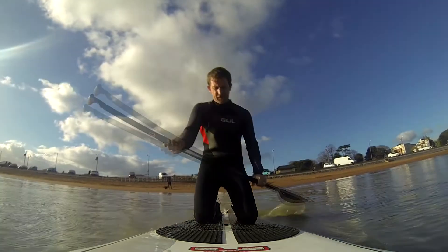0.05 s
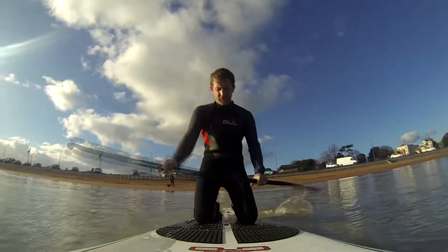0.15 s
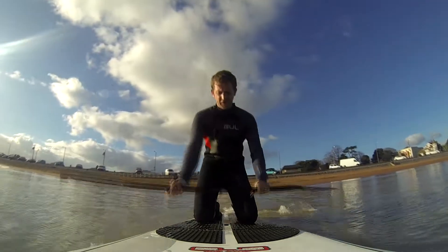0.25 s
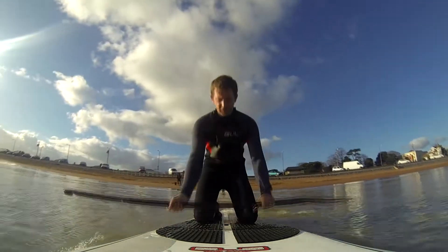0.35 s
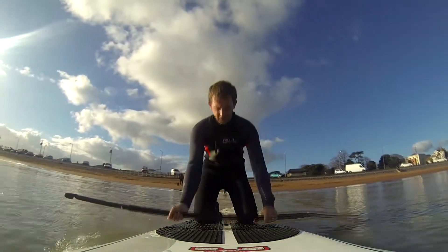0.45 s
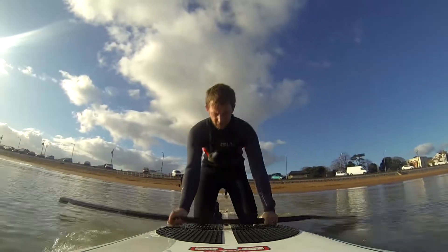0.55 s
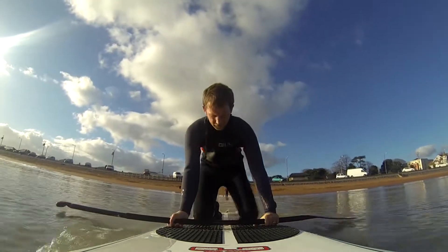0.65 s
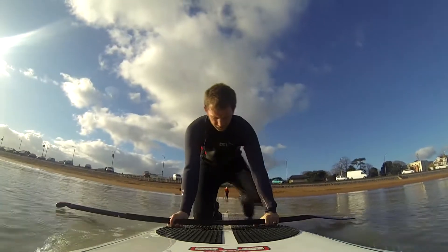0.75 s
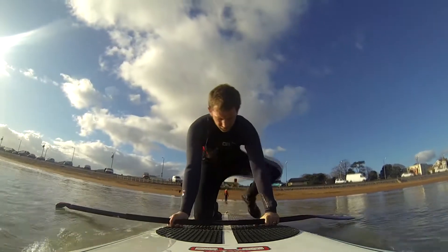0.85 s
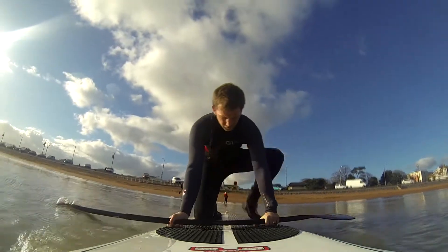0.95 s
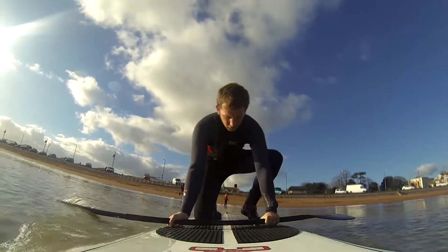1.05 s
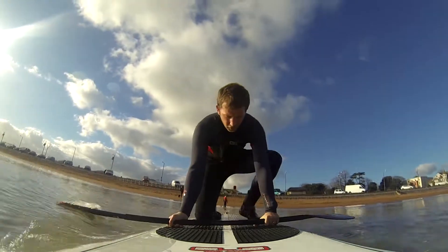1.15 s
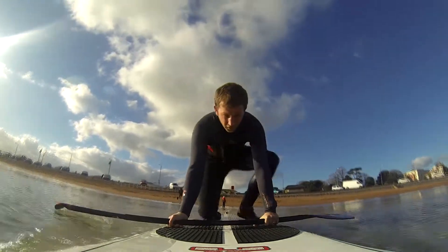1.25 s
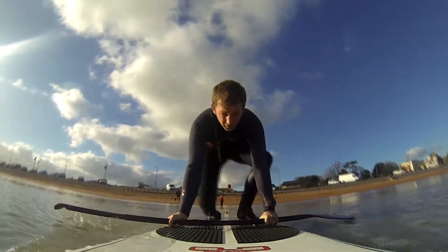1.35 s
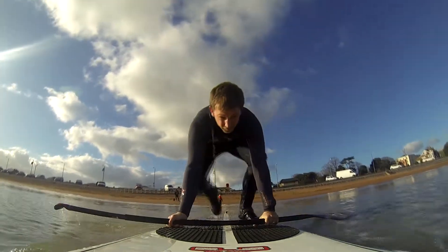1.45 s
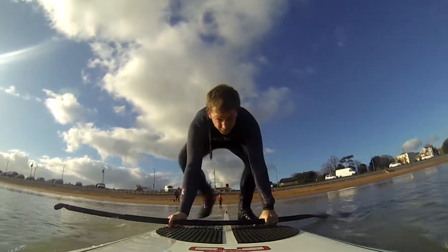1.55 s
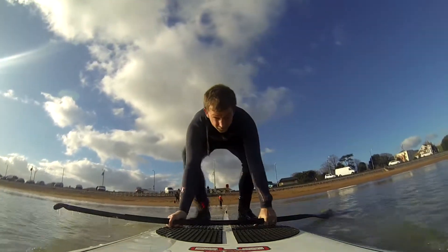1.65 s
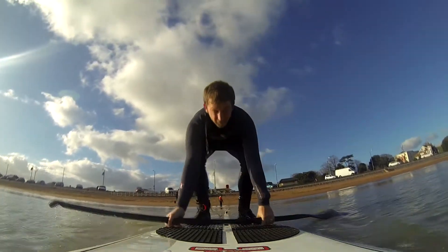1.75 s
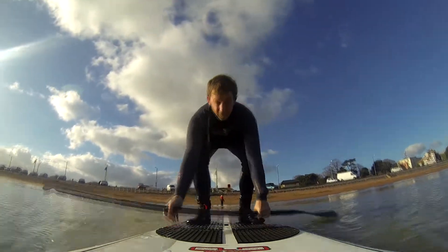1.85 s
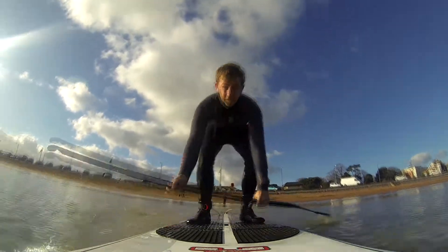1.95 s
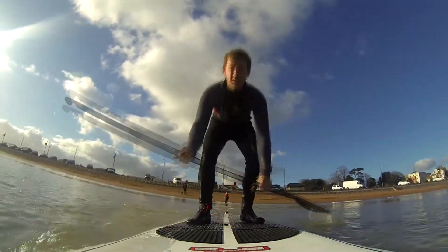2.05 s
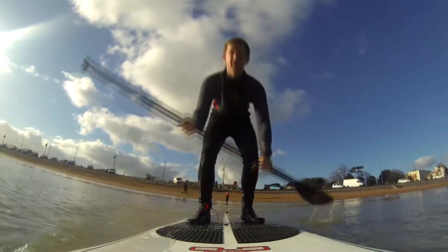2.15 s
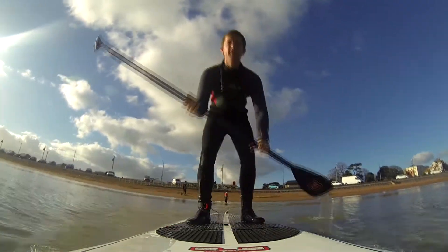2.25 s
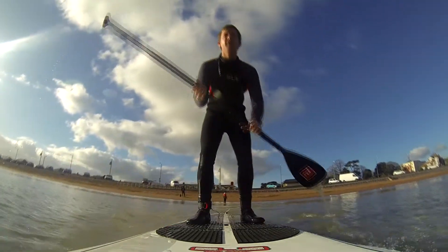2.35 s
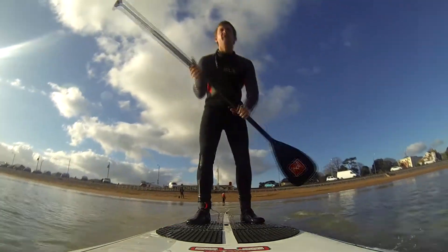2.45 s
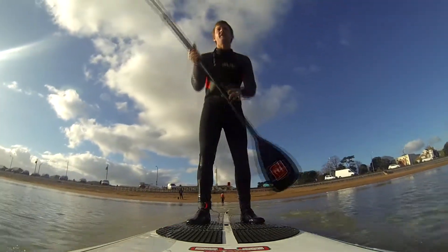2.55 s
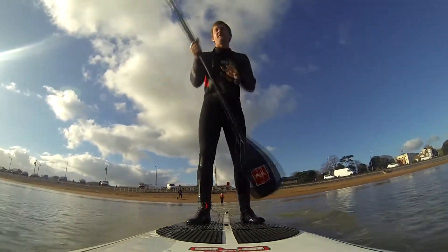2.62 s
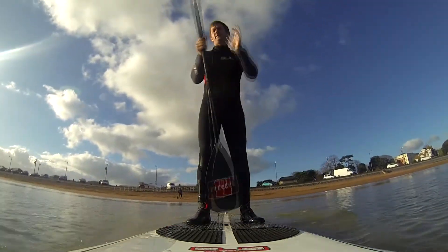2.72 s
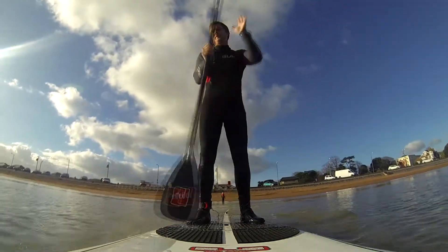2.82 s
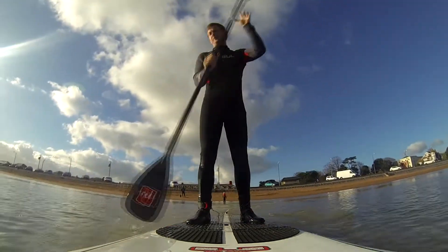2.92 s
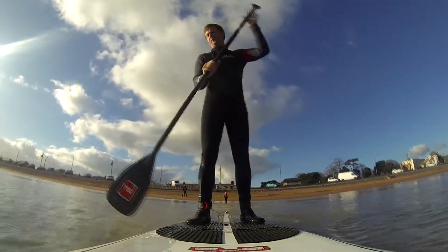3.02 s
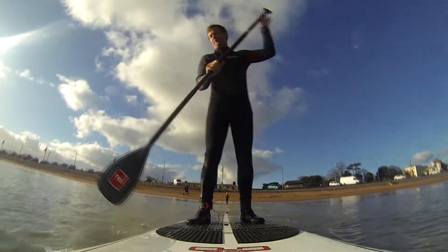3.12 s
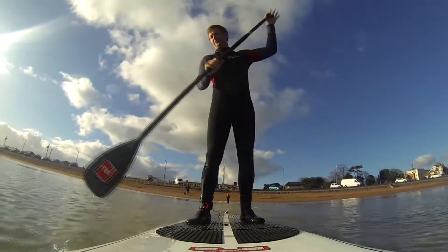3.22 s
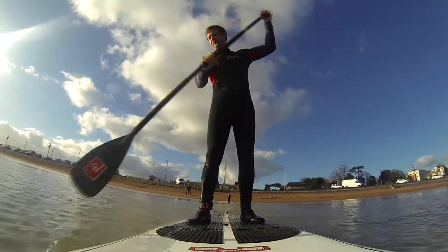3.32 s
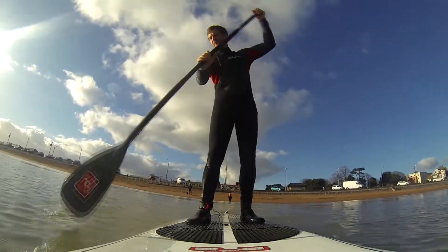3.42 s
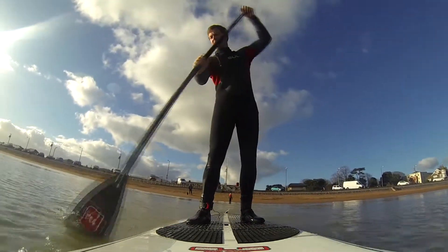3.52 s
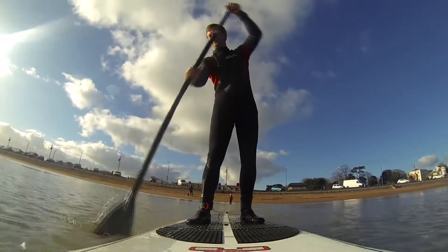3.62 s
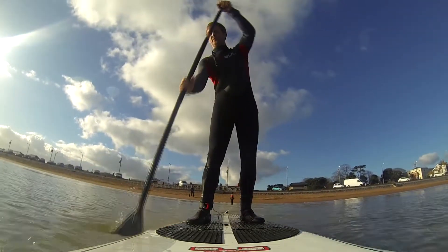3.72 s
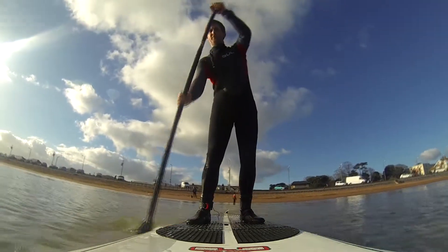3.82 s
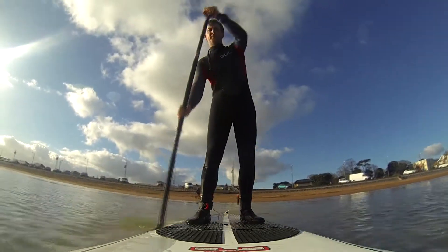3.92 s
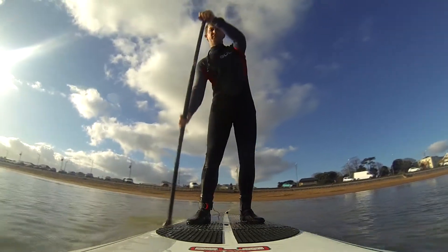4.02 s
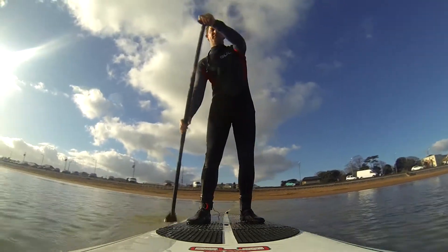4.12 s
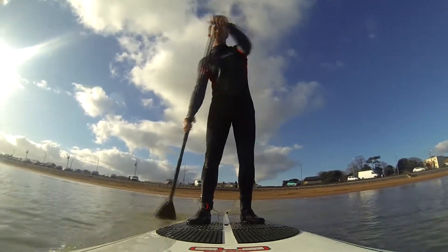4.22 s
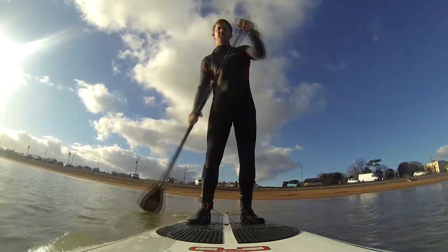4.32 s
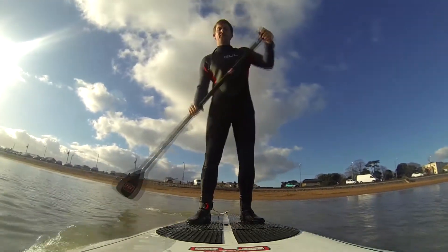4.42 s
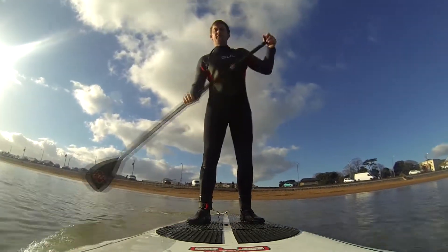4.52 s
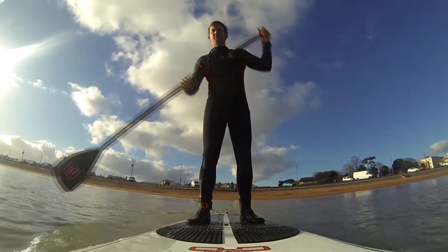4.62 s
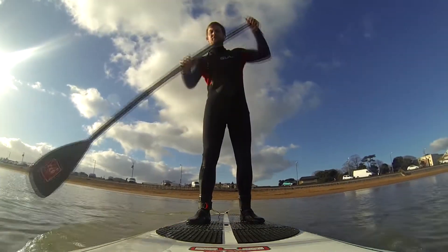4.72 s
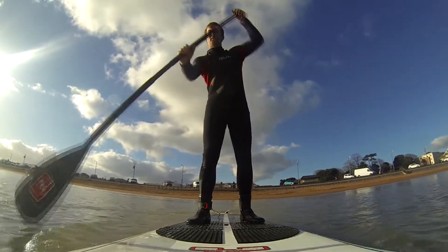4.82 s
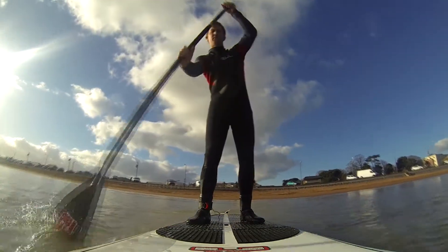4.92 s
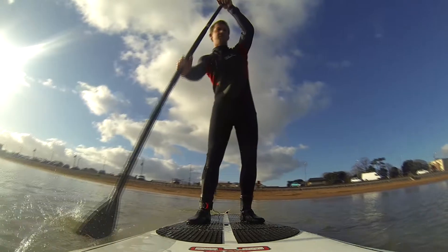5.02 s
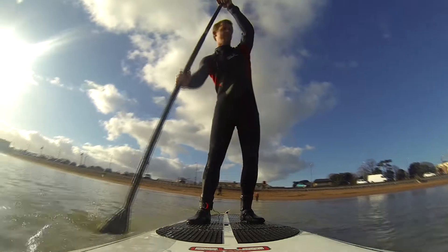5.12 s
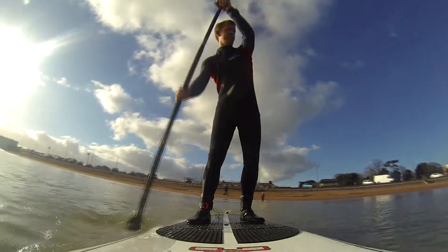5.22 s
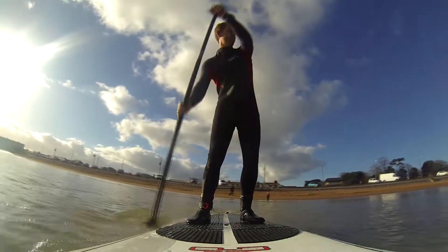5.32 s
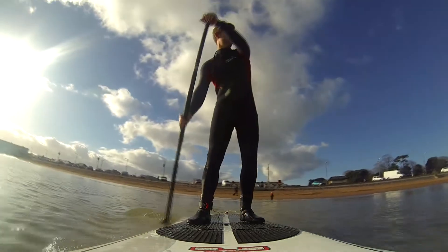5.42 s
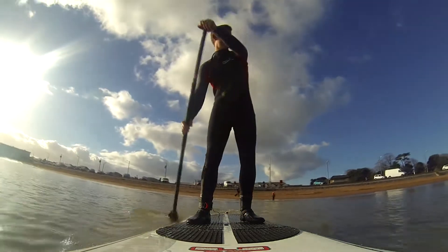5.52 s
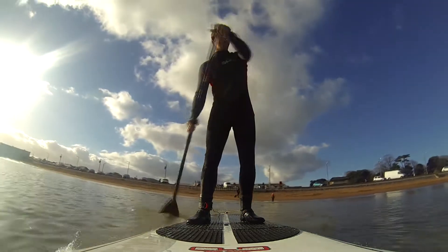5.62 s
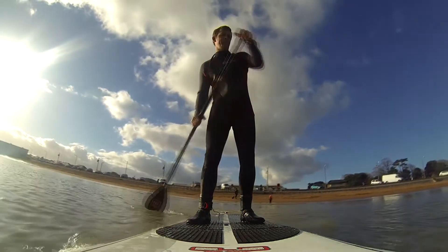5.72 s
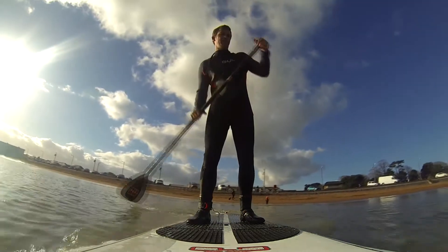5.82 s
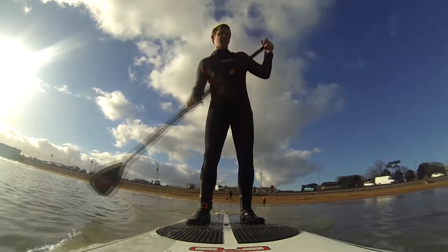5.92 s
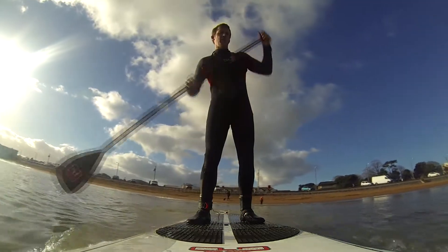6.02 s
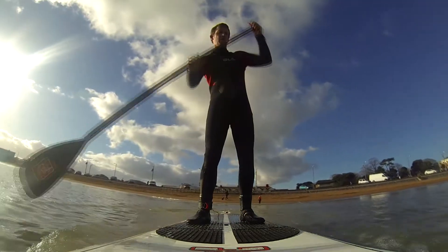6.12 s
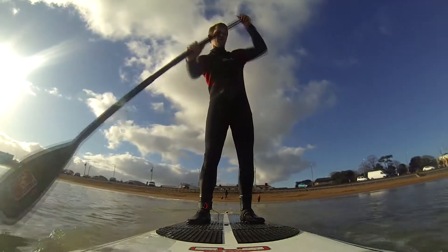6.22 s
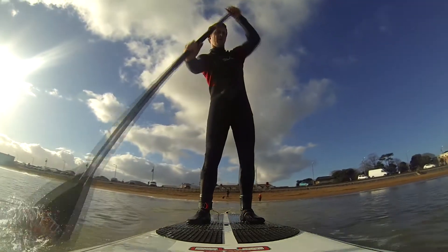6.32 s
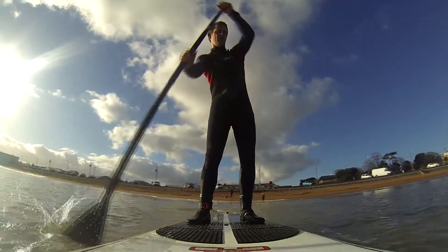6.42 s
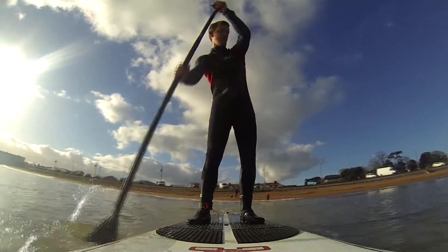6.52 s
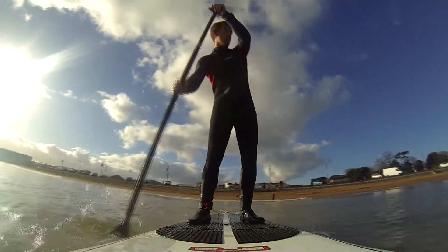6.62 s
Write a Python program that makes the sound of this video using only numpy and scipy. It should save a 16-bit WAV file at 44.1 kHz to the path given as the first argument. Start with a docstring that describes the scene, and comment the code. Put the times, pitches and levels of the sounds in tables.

```python
"""On a calm sea, a camera in a sealed housing rides on the nose of a paddleboard.
Water rushes and bubbles as struck resonators, and slaps as short tones of trapped air.
The housing rings near 1.5 kHz and muffles the treble; spray and starting foot scuffs tick as puffs of noise.
The hollow board hums at its low modes and thumps under the paddler's feet, which scuff the deck pad;
the pulled blade churns as low noise."""
import sys
import numpy as np
from scipy import signal
from scipy.fft import rfft, irfft
from scipy.io import wavfile
from scipy.ndimage import uniform_filter1d

SR = 44100
rng = np.random.default_rng(int(sys.argv[2]) if len(sys.argv) > 2 else 0)


def dump(signal):
    """Clip the signal to [-1, 1] and save it as 16-bit WAV at the path in sys.argv[1]."""
    limited = np.clip(np.atleast_2d(signal).T, -1, 1)
    pcm = np.round(limited * 32767).astype(np.int16)
    wavfile.write(sys.argv[1], SR, pcm)


N = 293706

# flow of water along the hull: t/s, rush level/dB, level of the gurgle through the board/dB
FLOW = [(0, -19.5, -33), (.6, -20, -31.5), (1.2, -23, -35), (1.62, -25.5, -38), (1.7, -34, -46),
        (1.86, -24, -35), (2.08, -24.5, -40), (2.22, -30, -44.5), (2.55, -28.5, -45.5), (2.68, -37, -54.5),
        (2.84, -27, -36.5), (3.1, -19, -34.5), (3.3, -24.5, -35.5), (3.67, -33.5, -43.5), (3.8, -29.5, -43),
        (3.99, -22, -38.5), (4.34, -24, -35), (4.97, -31, -41), (5.12, -32.5, -45.5), (5.22, -22.5, -34),
        (5.42, -24, -37), (5.88, -19.5, -29.5), (6.2, -26.5, -37), (6.38, -31, -41), (6.66, -21.5, -33.5)]
# waves that break over the nose: t/s, length/s, peak level/dB, treble and gurgle re that peak/dB
SURGES = [(0.659, 0.13, -17.5, 1, -31), (2.09, 0.11, -18.5, 7, -17.5), (2.284, 0.068, -17.5, -6, -20),
          (2.454, 0.1, -22, -15, -14.5), (2.79, 0.25, -25.5, 5, -12.5), (3.014, 0.12, -18, 3.5, -17),
          (3.452, 0.037, -20.5, 1, -12.5), (3.737, 0.014, -16.5, -21, -14.5),
          (3.922, 0.24, -17.5, 5, -11.5), (4.379, 0.073, -18, -6, -19.5), (5.308, 0.079, -22.5, 11.5, 1.5),
          (5.405, 0.18, -20.5, -13, -13), (5.786, 0.13, -27, 5.5, -2), (6.195, 0.13, -21, 1, -13),
          (6.58, 0.06, -17, -1.5, -7)]
# frequency response of the housing: f/Hz, level/dB
HOUSING_RESPONSE = [(600, -30.5), (1000, -18.5), (1250, -4), (1450, 2.5), (1700, -2.5), (2030, -18),
                    (2300, -15), (2800, -23), (3400, -22.5), (4100, -35), (5500, -41), (6000, -62),
                    (6600, -52.5), (8000, -63), (14000, -88)]
# frequency response of the path through the board to the mount: f/Hz, level/dB
MOUNT_RESPONSE = [(120, -24), (165, -25), (185, -11.5), (210, -19), (277, 0), (335, -10), (430, -8),
                  (468, -5), (560, -15), (830, -4.5), (990, -11.5), (1300, -39.5)]
# low modes of the hollow board: f/Hz, nominal width/Hz, level/dB
BOARD_MODES = [(63.2, 11.6, -6.5), (71.65, 10.4, 4), (77.5, 20, -4), (104.4, 33.3, -18)]
# weight shifts and waves that jolt the board: t/s, hum level/dB, heave level/dB, decay/(dB/s)
JOLTS = [(.1, -22.5, -38, 17.5), (0.493, -4.5, -22, 73), (.6, -17, -17.5, 59), (.87, -12.5, -39, 76.5),
         (0.987, -24, -9.5, 68), (1.033, -15, -26, 98), (1.36, -22, -38, 25.5), (1.633, -17, -23.5, 57.5),
         (1.79, -12.5, -21.5, 38), (1.92, -29, -17.5, 32.5), (2.97, -14.5, -47, 85.5),
         (3.171, -27.5, -31, 62), (3.7, -21, -40, 44), (3.909, -21, -44, 35.5), (4.271, -19.5, -42, 48),
         (5.141, -18.5, -48, 26), (5.319, -17, -33, 97), (6.0, -19, -52, 62.5)]
# landings of the feet: t/s, peak level/dB, f/Hz
THUMPS = [(0.999, -23, 45.2), (1.057, -12, 61.3), (1.646, -5, 69.7)]
# bright ticks, from spray on the housing and the starts of foot scuffs: t/s, level before filtering/dB
TICKS = [(0.3243, -50.5), (0.669, -50), (0.8696, -60), (0.9963, -55), (1.0851, -54), (1.2916, -60),
         (1.372, -53), (1.467, -50), (1.555, -58), (1.6366, -31.5), (1.6922, -54), (1.9336, -48),
         (2.1213, -47), (2.4031, -62), (2.4979, -53), (3.2761, -54), (3.333, -48), (3.3837, -46.5),
         (4.1404, -44), (4.2818, -52), (4.433, -49), (4.635, -63), (4.7233, -55), (4.876, -53),
         (5.1673, -56), (5.313, -57), (5.345, -48), (5.7335, -54), (5.8912, -51), (6.1945, -53)]
# slaps of water on the nose: t/s, level before the band-pass/dB, f/Hz
SLAPS = [(0.0334, -4.5, 1550), (0.0627, -8, 1480), (0.211, -5, 1410), (0.2884, -4, 1470),
         (0.3697, -8, 1405), (0.4425, -4, 1390), (0.637, -6, 1380), (0.7404, -12, 1540),
         (0.7996, -7.5, 1390), (0.8804, -6, 1460), (0.9073, -7, 1370), (1.1242, -5, 1560),
         (1.6199, -8, 1430), (2.151, -9, 1500), (2.2477, -3.5, 1600), (2.2927, -4.5, 1584),
         (2.5023, -3, 1400), (2.747, -9.5, 1540), (2.9096, -4.5, 1345), (3.026, -3.5, 1490),
         (3.3747, -8.5, 1530), (3.4347, -13, 1577), (3.534, -12.5, 1340), (3.5638, -12.5, 1420),
         (3.7362, -2.5, 1420), (3.7477, -4.5, 1430), (3.8013, -9, 1630), (4.0156, -4.5, 1810),
         (4.098, -3, 1376), (4.14, 3.5, 1400), (4.1917, -5.5, 1370), (4.199, -5, 1470), (4.3245, -12, 1370),
         (4.4324, -3, 1640), (4.5441, -6.5, 1510), (5.224, -8, 1650), (5.288, -19, 1420),
         (5.3187, -5, 1380), (5.375, -5.5, 1570), (5.473, -1, 1390), (5.5298, -2.5, 1455),
         (5.913, -9, 1573), (5.9764, -6.5, 1590), (6.3236, -3, 1510), (6.5117, -7.5, 1490),
         (6.614, -11, 1280), (6.6544, -6.5, 1681)]
# bright droplets: t/s, level before roughening/dB, f/Hz
DROPS = [(1.224, -24, 1910), (1.385, -24, 2300), (1.466, -19, 2230), (1.530, -22, 2170), (1.579, -16, 1810),
         (1.631, -23, 2600), (2.226, -34, 4960), (2.261, -35.5, 4860), (2.403, -26.5, 2190),
         (2.623, -37, 3320), (2.896, -26, 3400), (3.336, -16, 2190), (3.749, -22, 2640), (3.785, -29, 3280),
         (3.800, -18.5, 2410), (3.929, -38, 4900), (3.961, -28, 3660), (4.121, -17.5, 2195),
         (5.269, -23, 3330), (5.345, -27, 2440), (6.445, -35, 3550)]
# hollow glugs under the hull: t/s, level without the mount's ring/dB, f/Hz
GLUGS = [(1.104, -27, 570), (1.287, -27, 326), (1.401, -30, 233), (1.508, -29, 312), (2.028, -27, 288),
         (2.241, -25.5, 328), (2.906, -28, 794), (3.45, -21, 270), (3.705, -21, 794), (3.706, -29, 460),
         (3.89, -30, 480), (4.044, -14.5, 926), (4.059, -30.5, 315), (4.535, -25.5, 280), (4.989, -36, 310),
         (5.351, -15, 860), (5.643, -28.5, 262), (5.969, -23, 253), (6.12, -29, 255), (6.596, -30, 248)]
# drags of the feet over the deck pad: t/s, length/s, level before roughening/dB
SCUFFS = [(0.666, 0.075, -51), (0.996, 0.02, -58), (1.369, 0.037, -53), (1.628, 0.032, -46),
          (2.12, 0.026, -59)]
# drags of the blade through the water: t/s, length/s, level/dB
PULLS = [(3.88, 0.22, -22.5), (5.14, 0.32, -34)]

BUBBLES_PER_S, SPLASHES_PER_S = 700, 45
# a share is the part of the flow's swing in dB that a level follows
MEAN_FLOW_DB, TREBLE_DB, TREBLE_SHARE = -25, 0, 1     # treble level re mean flow
HUM_DB, HUM_SHARE, HEAVE_DB, JOLT_RISE_S = -29, 0.57, -37, 0.02
HISS_DB, TOP_STOP_HZ = -83, 14400


def amp(db):
    """Decibel law: level to amplitude gain."""
    return 10 ** (np.asarray(db) / 20)


def rms_one(x):
    """Normalisation to unit mean power."""
    return x / np.sqrt(np.mean(x ** 2) + 1e-20)


def in_time(rows):
    """Linear interpolation of a table's columns over time."""
    s, *columns = np.transpose(rows)
    return [np.interp(np.arange(N) / SR, s, c) for c in columns]


def follow_flow(share, mean_db):
    """Proportional levels: the gain follows a share of the flow's swing in decibels."""
    rush_db = in_time(FLOW)[0]
    return amp(mean_db + share * (rush_db - MEAN_FLOW_DB))


def strokes(rows):
    """Half-sine envelope over each (start, length, level)."""
    t = np.arange(N) / SR
    return sum(amp(db) * np.sin(np.pi * np.clip((t - s) / length, 0, 1)) for s, length, db in rows)


def drift(rate_hz):
    """Low-passed chance: sparse noise through a double one-pole, scaled to unit spread."""
    step = 40     # samples
    r = np.exp(-2 * np.pi * rate_hz * step / SR)
    noise = rng.standard_normal(N // step + 2002)
    slow = signal.lfilter([1], [1, -2 * r, r * r], noise)[2000:]     # start-up discarded
    return np.interp(np.arange(N) / step, np.arange(len(slow)), rms_one(slow))


def colour(x, points):
    """Minimum-phase filtering: a folded cepstrum gives the causal filter with this response."""
    size = 8192
    hz, db = np.transpose(points)
    grid = np.maximum(np.arange(size // 2 + 1) * SR / size, 1)
    log_gain = np.interp(np.log(grid), np.log(hz), db) * np.log(10) / 20
    cepstrum = irfft(log_gain)
    cepstrum[1:size // 2] *= 2
    cepstrum[size // 2 + 1:] = 0
    impulse_response = irfft(np.exp(rfft(cepstrum)))
    return signal.fftconvolve(x, impulse_response)[:N]


def resonate(x, hz, width_hz):
    """Damped resonance: a pole pair with unit gain on top."""
    r = np.exp(-np.pi * width_hz / SR)
    zeros = [(1 - r * r) / 2, 0, (r * r - 1) / 2]
    poles = [1, -2 * r * np.cos(2 * np.pi * hz / SR), r * r]
    return signal.lfilter(zeros, poles, x)


def band(x, low_hz, high_hz):
    """Band limitation by a Butterworth band-pass."""
    return signal.sosfilt(signal.butter(2, [low_hz, high_hz], "band", fs=SR, output="sos"), x)


def blips(rows, cycles, climb):
    """Trapped air pockets: tones that swell over a few cycles, climb in pitch and die away."""
    out, t = np.zeros(N + 8192), np.arange(8192) / SR
    for (s, db, hz), (u, v) in zip(rows, rng.random((len(rows), 2))):
        i = round(s * SR)
        x = t * hz / (cycles * (0.6 + 0.45 * u))     # time in units of the swell
        swell = x * np.exp(1 - x)
        onset = 1 - np.exp(-(t * hz / 0.66) ** 2)
        tone = np.sin(2 * np.pi * (hz * t * (1 + climb * (x - 2)) + v))
        out[i:i + len(t)] += amp(db) * swell * onset * tone
    return out[:N]


def splashes(fade_s, spread_db):
    """Random small waves: each break lifts the gain, which then decays exponentially."""
    breaks = amp(spread_db * rng.standard_normal(N)) * (rng.random(N) < SPLASHES_PER_S / SR)
    keep = np.exp(-1 / (fade_s * SR))
    fading = signal.lfilter([1], [1, -keep], breaks)
    gain = 0.88 + signal.lfilter([.02], [1, -.98], fading)     # softened rise
    return gain / uniform_filter1d(gain, size=9000)      # the mean flow stays even


def bubbles(low_hz, high_hz, per_s, sharpness, spread_db, patchy_db, foam_db):
    """Bubble resonance: bursts and foam noise ring 36 pitches, whose levels flicker separately."""
    sizes = amp(spread_db * np.minimum(rng.exponential(1, N), 2.4)) * rng.choice([-1, 1], N)
    clicks = rms_one(sizes * (rng.random(N) < per_s / SR))
    dealt = rng.integers(0, 36, N)     # the pitch that each burst excites
    foam = amp(foam_db) * rng.standard_normal((2, N))
    out = np.zeros(N)
    for k, hz in enumerate(np.geomspace(low_hz, high_hz, 36)):
        flicker = amp(patchy_db * drift(15.7))
        source = 6 * clicks * (dealt == k) + foam[k % 2]
        out += flicker * np.sqrt(sharpness / hz) * resonate(source, hz, hz / sharpness)
    return out


def trickle(count):
    """Superposition of small droplets at random moments, sizes and pitches."""
    s, size, pitch = rng.random((count, 3)).T
    rows = np.c_[s * N / SR, 14 * size + 8 * pitch, 900 * 8.0 ** pitch]
    return rms_one(blips(rows, cycles=5.0, climb=0.018))


def wash():
    """Filtered flow noise: breaking waves swell the rush, its treble and the gurgle in the mount."""
    rush_db, gurgle_db = in_time(FLOW)
    s, length, peak_db, treble_db, under_db = np.transpose(SURGES)
    waves = splashes(fade_s=0.018, spread_db=2.0)
    near = bubbles(683.5, 12770, BUBBLES_PER_S, sharpness=16.7, spread_db=-0.5, patchy_db=1.5, foam_db=3.0)
    under = bubbles(132.3, 1270, 250, sharpness=13.0, spread_db=5.0, patchy_db=3.5, foam_db=-0.5)
    water = waves * rms_one(near) + amp(-6.5) * trickle(count=900)
    rush = rms_one(colour(water, HOUSING_RESPONSE))
    gurgle = rms_one(colour(waves ** 0.77 * under, MOUNT_RESPONSE))
    split_hz = 2200
    low = signal.sosfilt(signal.butter(4, split_hz, fs=SR, output="sos"), rush)
    high = signal.sosfilt(signal.butter(4, split_hz, "high", fs=SR, output="sos"), rush)
    # flow and surges add in power
    body_gain = np.hypot(amp(rush_db), strokes(zip(s, length, peak_db)))
    treble_flow = follow_flow(TREBLE_SHARE, MEAN_FLOW_DB + TREBLE_DB)
    treble_gain = np.hypot(treble_flow, strokes(zip(s, length, peak_db + treble_db)))
    gurgle_gain = np.hypot(amp(gurgle_db), strokes(zip(s, length, peak_db + under_db)))
    treble = treble_gain * high * splashes(fade_s=0.0064, spread_db=3.0)
    return body_gain * low + treble + gurgle_gain * gurgle


def jolts():
    """Transient excitation: the power of hum and heave rises quickly, then decays steadily."""
    t, power = np.arange(N) / SR, np.zeros((2, N))
    for s, hum_db, heave_db, fall in JOLTS:
        since = np.maximum(t - s, 0)
        rise = 1 - np.exp(-since / JOLT_RISE_S)
        power += (amp([[hum_db], [heave_db]]) * rise * amp(-fall * since)) ** 2
    return power


def modes(x):
    """Modal superposition: paired resonators of alternating sign make up the hollow board."""
    out = np.zeros(len(x))
    for k, (hz, width, db) in enumerate(BOARD_MODES):
        each_width = 1.6 * width     # two in cascade are narrower than one
        out += (-1) ** k * amp(db) * resonate(resonate(x, hz, each_width), hz, each_width)
    return out


def thumps():
    """Impulse response: each footfall strikes a short dull resonance through a soft sole."""
    out, sole = np.zeros(N), signal.butter(3, 230, fs=SR, output="sos")
    for s, db, hz in THUMPS:
        impulse = np.r_[1, np.zeros(SR // 2)]
        knock = signal.sosfilt(sole, resonate(impulse, hz, 7))
        out[round(s * SR):][:len(knock)] += amp(db) * knock / np.abs(knock).max()
    return out


def board():
    """Forced vibration: flow and jolts set the hum of the modes, jolts the heave; footfalls add knocks."""
    hum_power, heave_power = jolts()
    white = rng.standard_normal((2, N + SR))     # the first second lets the filters settle
    hum = rms_one(modes(white[0])[SR:])
    heave = rms_one(band(white[1], 34, 45)[SR:])
    # evens out the random loudness wobble of the hum
    hum = hum / (uniform_filter1d(hum ** 2, size=1500) + .1) ** 0.13
    hum = signal.sosfilt(signal.butter(6, 125, fs=SR, output="sos"), hum)     # damped above the modes
    hum_gain = np.sqrt(hum_power + follow_flow(HUM_SHARE, HUM_DB) ** 2)
    heave_gain = np.sqrt(heave_power + amp(HEAVE_DB) ** 2)
    return hum_gain * rms_one(hum) + heave_gain * heave + thumps()


def ticks():
    """Impulsive noise: puffs of milliseconds, bright at set moments and of any colour at random ones."""
    chance = rng.random((3, N)) < np.c_[[30, 20, 8]] / SR     # hits per second in each band
    hits = amp(4.1 * rng.standard_normal((3, N))) * chance * follow_flow(0.74, -57.5)
    for s, db in TICKS:
        hits[1:, round(s * SR)] = amp(db)     # in the two brighter bands
    fade = np.exp(-1 / (0.002 * SR))
    puffs = signal.lfilter([.1], [1, -.9], signal.lfilter([1], [1, -fade], hits))
    colours = [(2780, 4780, 8.0), (4500, 7000, -2.5), (6500, 9500, -8.0)]     # low f/Hz, high f/Hz, level/dB
    out = np.zeros(N)
    for puff, (low, high, db) in zip(puffs, colours):
        noise = band(band(rng.standard_normal(N), low, high), low, high)
        out += amp(db) * puff * rms_one(noise)
    return out


def slaps():
    """Trapped-air oscillation: slaps and droplets carry spray, droplets are uneven, glugs ring the mount."""
    tones = blips(SLAPS, cycles=2.4, climb=0.0013)
    drops = blips(DROPS, cycles=5.4, climb=0.0065)
    glugs = blips(GLUGS, cycles=1.82, climb=0.0081)
    spray_gain = np.abs(tones) + amp(16.5) * np.abs(drops)
    spray = band(band(spray_gain * rng.standard_normal(N), 2500, 3270), 2400, 6000)
    rough = amp(3.0 * drift(540.0))
    ring = resonate(glugs, 277, 12)
    return band(tones, 900, 3800) + amp(-13.5) * spray + rough * drops + glugs + amp(3) * ring


def scuffs():
    """Friction noise: rubber soles drag on the deck pad in brief bright hisses."""
    hiss = rms_one(band(rng.standard_normal(N), 4100, 7360))
    return strokes(SCUFFS) * hiss * amp(2.0 * drift(60.0))


def churn():
    """Turbulence noise: the pulled blade churns in a low band."""
    return strokes(PULLS) * rms_one(band(rng.standard_normal(N), 78, 135))


def scene():
    """Superposition of all that reaches the microphone."""
    return (wash() + board() + ticks() + slaps() + scuffs() + churn())[None]


def record(dry):
    """Peak limiting: gain control holds peaks down and recovers slowly; faint preamp hiss, steep top cut."""
    ceiling_db = -.8
    recover = 22.0 * np.arange(N) / SR     # 22 dB per second
    over = np.maximum(20 * np.log10(np.abs(dry[0]) + 1e-9) - ceiling_db, 0)
    held = np.maximum.accumulate(over + recover) - recover
    early = np.r_[held[45:], np.full(45, held[-1])]     # it looks a millisecond ahead
    cut_db = uniform_filter1d(early, size=130)
    hiss = amp(HISS_DB) * rms_one(band(rng.standard_normal(dry.shape), 3000, 14000))
    top_cut = signal.cheby2(12, 70, TOP_STOP_HZ, fs=SR, output="sos")
    return signal.sosfilt(top_cut, dry * amp(-cut_db) + hiss)


dry = scene()
out = record(dry)
dump(out)
```